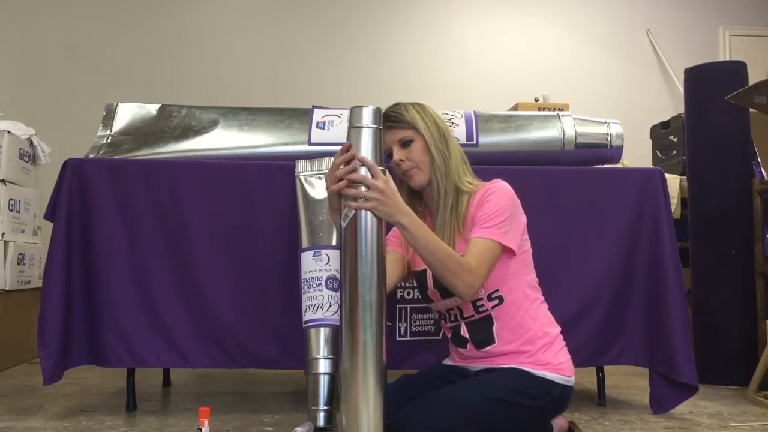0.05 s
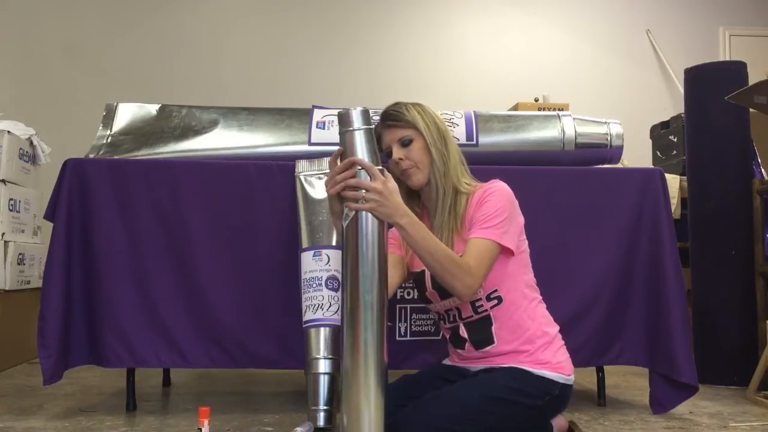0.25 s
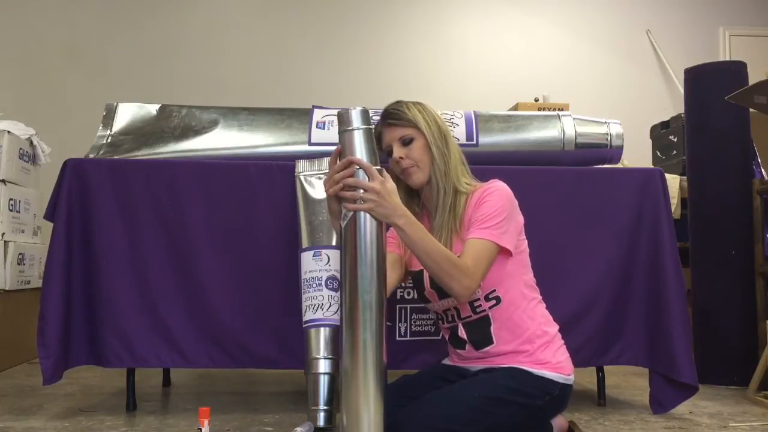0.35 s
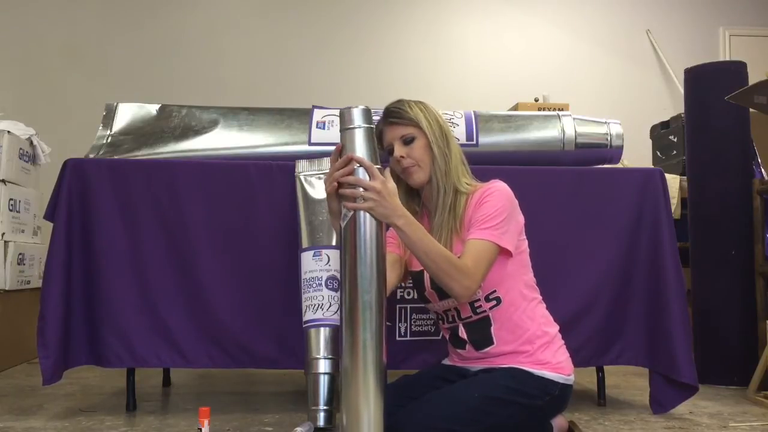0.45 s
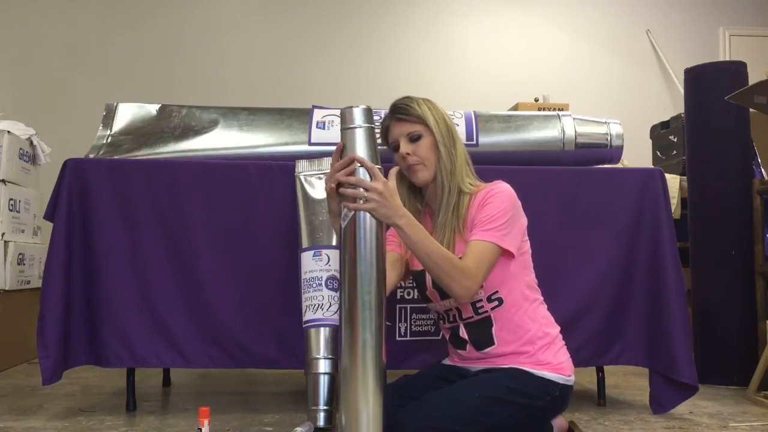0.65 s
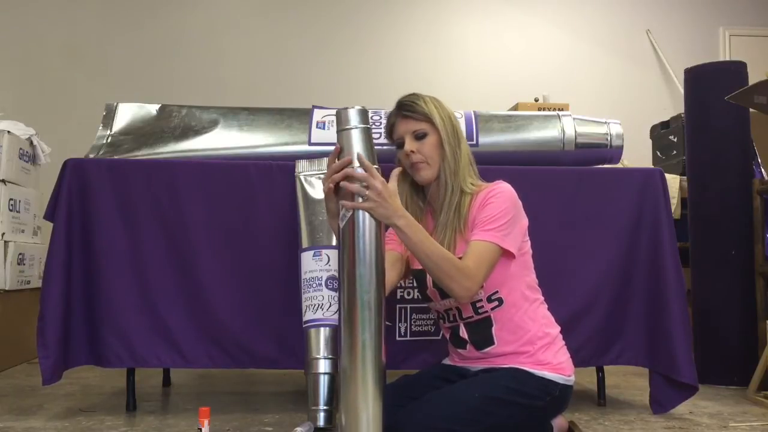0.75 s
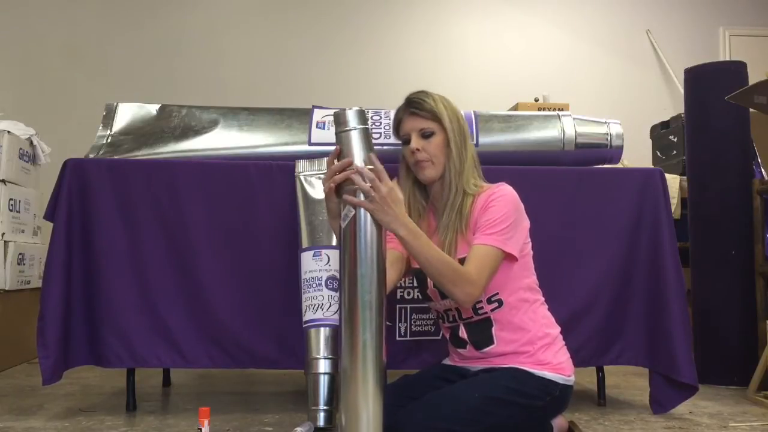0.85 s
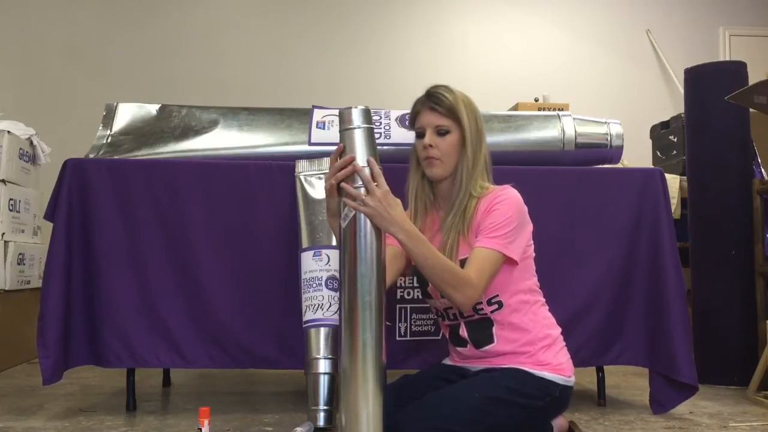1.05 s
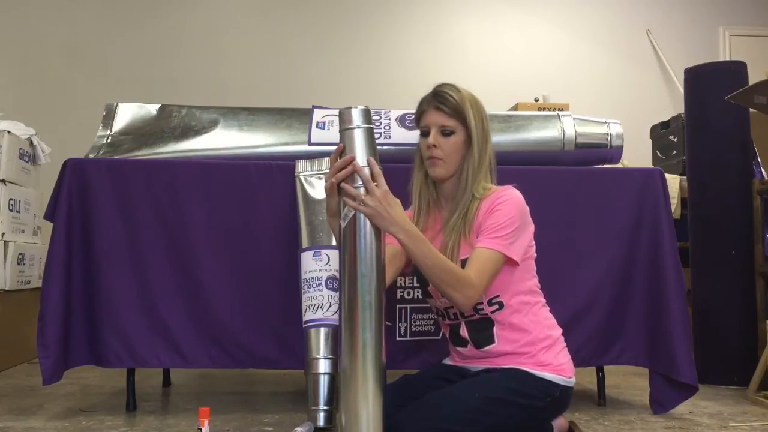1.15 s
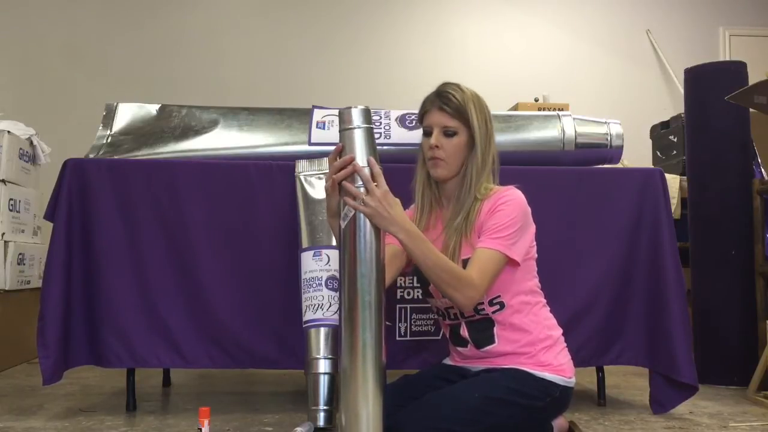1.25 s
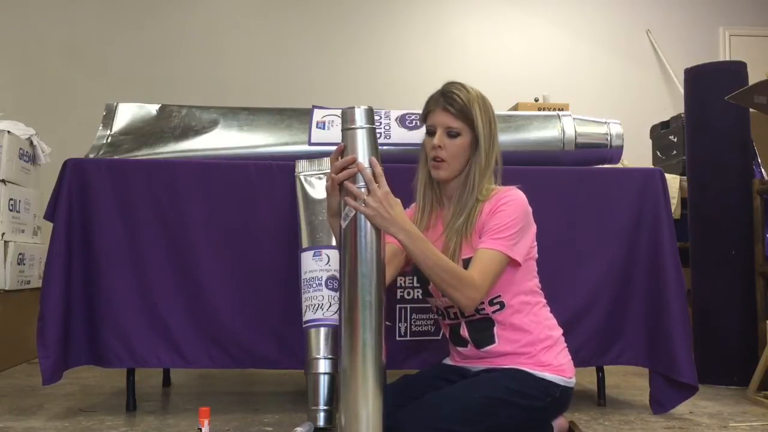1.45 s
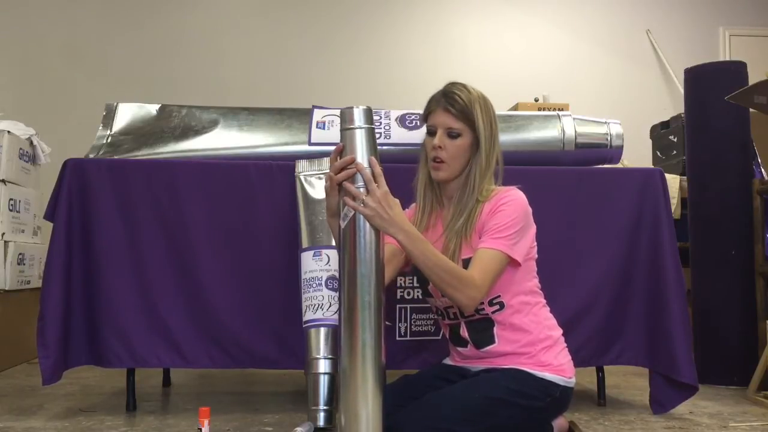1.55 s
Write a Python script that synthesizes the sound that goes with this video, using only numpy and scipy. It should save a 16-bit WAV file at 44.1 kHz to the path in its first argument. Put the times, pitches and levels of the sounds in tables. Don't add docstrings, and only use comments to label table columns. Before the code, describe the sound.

Thin sheet-metal duct snaps onto a pipe with a sharp crack, then light ticking and scraping

```python
import sys
import numpy as np
from scipy import signal
from scipy.fft import rfft, irfft
from scipy.io import wavfile
from scipy.ndimage import uniform_filter1d

SR = 44100
rng = np.random.default_rng(int(sys.argv[2]) if len(sys.argv) > 2 else 0)


def volts(x):
    e = np.asarray(x, float) / 20
    return 10 ** e


def wav_out(sig):
    wavfile.write(sys.argv[1], SR, np.round(np.clip(np.atleast_2d(sig).T, -1, 1) * 32767).astype(np.int16))


N = 70560

# t/s, level/dB, burst t60/s, low-body weight/dB
CRACKS = [(-.02, -52, 0.11, 3), (0.186, -59, 0.23, 2.5), (0.2217, -19, 0.055, -6), (.231, -29, 0.028, 15),
          (0.248, -33.5, 0.11, -11), (0.31, -38.5, 0.13, 10), (0.535, -63, 0.18, 16.5),
          (0.566, -52.5, 0.054, -2), (.571, -47.5, 0.021, -12), (0.681, -58.5, 0.022, 12),
          (0.749, -57.5, 0.056, -4), (0.761, -37, 0.048, -13), (.939, -47, 0.034, -11),
          (.946, -50.5, 0.048, 0.5), (1.066, -66.5, 0.016, 7), (1.102, -63, 0.018, -3),
          (1.261, -65, 0.031, 15), (1.4228, -62, 0.036, -4), (1.474, -60.5, 0.021, 1.5),
          (1.5868, -45, 0.044, -14)]
# f/Hz, level/dB per Hz
CRACK_COLOUR = [(200, -12.5), (900, -6.5), (1500, -3), (3400, -13.5), (4400, -9), (5000, -12.5),
                (9000, -13.5), (15000, -18)]
# f/Hz, level/dB, t60/s
DUCT_MODES = [(620, -52, 0.073), (988, 8.5, 0.61), (1158, -23, 0.085), (1270, 15, 0.16), (1350, -11, .1),
              (1620, -48, 0.027), (1883, 12, 0.04), (2330, -16, 0.055), (2670, -34, 0.035),
              (3860, -14, 0.024), (4530, -27, 0.039), (4460, -27, .03), (5600, -31, 0.049),
              (2470, 7.5, 0.057)]
# t/s, level/dB, f/Hz, t60/s
TICKS = [(0.194, -49, 1032, 0.17), (0.224, -18, 1224, 0.026), (.224, -22.5, 1851, 0.038),
         (.243, -25.5, 1359, 0.066), (.252, -32, 1650, 0.033), (0.295, -29.5, 1680, 0.051),
         (0.231, -19, 1269, 0.059), (0.257, -24.5, 1303, 0.036), (0.281, -25, 1740, 0.019),
         (.320, -32, 2150, 0.05), (.326, -22.5, 2153, 0.022), (.327, -24.5, 2452, 0.036),
         (0.334, -29, 1490, 0.022), (.342, -30.5, 1900, 0.046), (0.359, -39, 1426, 0.058),
         (.336, -26.5, 872, 0.036), (0.395, -39, 1370, 0.037), (0.568, -46, 1190, 0.04),
         (.582, -46.5, 1270, 0.072), (0.594, -47.5, 1185, 0.34), (0.64, -37, 1407, 0.047),
         (0.658, -46.5, 1348, 0.12), (0.681, -35, 1340, 0.059), (0.707, -46.5, 1404, 0.076),
         (0.766, -34.5, 1300, 0.029), (0.887, -51.5, 1200, 0.082), (.945, -32, 1296, 0.022),
         (0.978, -47, 915, 0.14), (1.064, -47.5, 1352, 0.065), (1.107, -44, 1292, 0.067),
         (1.123, -61, 1970, 0.042), (1.14, -70, 1570, 0.04), (1.07, -59, 1950, 0.084),
         (1.165, -58, 1495, .05), (1.194, -56, 1205, 0.074), (1.265, -43.5, 1270, 0.022),
         (1.265, -49.5, 1730, 0.026), (1.264, -52.5, 598, 0.067), (1.427, -45.5, 1130, 0.046),
         (1.428, -56, 577, 0.093), (1.479, -36, 1155, 0.016), (1.476, -51, 1853, 0.048)]
# t/s, level/dB, f/Hz, t60/s
POPS = [(0.225, -24, 391, 0.096), (0.233, -26, 187, 0.082), (0.278, -28.5, 458, 0.1),
        (0.301, -31.5, 187, 0.066), (0.331, -23.5, 376, 0.064), (0.333, -31, 154, 0.041),
        (.318, -30.5, 196, 0.083), (.345, -33, 201, 0.073), (1.04, -49, 189, .12), (1.145, -44.5, 343, .06),
        (1.275, -51.5, 302, 0.052), (.69, -48, 100, .08), (.342, -17.5, 576, 0.037),
        (0.384, -26, 364, 0.037), (0.393, -41, 183, 0.11), (0.442, -34.5, 165, 0.05),
        (0.546, -43, 363, 0.082), (0.553, -47.5, 194, 0.13), (0.583, -34, 117, 0.06),
        (0.643, -31, 168, 0.04), (.768, -34, 218, 0.036), (.778, -40, 614, 0.053),
        (0.849, -53, 214.2, 0.68), (0.897, -36, 210, 0.039), (0.949, -34, 213, 0.052),
        (0.977, -32.5, 244, 0.082), (0.982, -43.5, 417.4, 0.18), (0.981, -38, 118, 0.054),
        (1.030, -40, 386, 0.06), (1.104, -42, 184.5, 0.29), (1.11, -48, 556, 0.089),
        (1.127, -34, 182.7, 0.068), (1.101, -41, 336.4, 0.094), (1.149, -44, 251, 0.07),
        (1.191, -41, 185, 0.037), (1.267, -41, 184, 0.056), (1.479, -41.5, 207, 0.044)]
# t/s, level/dB, f/Hz, t60/s
MORE_TICKS = [(0.021, -49, 1270, 0.069), (.278, -30, 2600, 0.032), (0.452, -55, 990, 0.16),
              (.572, -47.5, 1185, 0.33), (.639, -46.5, 1990, 0.031), (0.68, -48, 1930, 0.074),
              (0.692, -42.5, 1083, 0.057), (.764, -45, 2100, 0.037), (.790, -52, 990, 0.19),
              (0.885, -50, 360, 0.14), (1.010, -60, 805, 0.33), (.946, -46, 2170, 0.047),
              (0.566, -49, 2600, 0.074), (.639, -51, 860, 0.052), (.548, -50.5, 1350, 0.079),
              (1.4765, -44, 850, 0.025), (1.8, -52, 890, 0.046), (.97, -50, 1200, .08), (.78, -47, 1400, .08)]
EDGE_HITS_S = (.2222, .7625, .9412, 1.5872)
# level/dB, f/Hz, t60/s
EDGE_MODES = [
    [(-31, 2700, .05), (-31, 4540, .05), (-30, 6080, .04), (-34, 6870, .04)],
    [(-40, 4350, .025), (-38, 4580, .03), (-45, 5940, .04), (-47, 7190, .04), (-48, 8730, .04)],
    [(-45, 4230, .04), (-47, 4420, .03), (-46, 5520, .05), (-49, 5350, .03), (-52, 7010, .04),
     (-52, 8000, .025)],
    [(-53, 1850, .05), (-51, 2350, .05), (-52, 2700, .05), (-46, 4300, .05), (-48, 4560, .05),
     (-51, 5430, .04), (-55, 7010, .04), (-54, 8910, .05)],
]
# start t/s, length/s, start f/Hz, end f/Hz, level/dB
BUCKLE = (.321, .018, 620, 1850, -27)
# t/s, level/dB
RUB_LEVEL = [(0, -59), (.09, -75), (.17, -66.5), (.205, -56.5), (.225, -34), (.31, -38.5), (.335, -33.5),
             (.40, -51.5), (.49, -62.5), (.53, -63.5), (.585, -53), (.74, -71.5), (.79, -53), (.86, -72),
             (.97, -50.5), (1.05, -72.5), (1.12, -57), (1.24, -73.5)]
# f/Hz, level/dB per Hz
RUB_COLOUR = [(80, -5.5), (190, 5.5), (400, 1.5), (800, -2.5), (1300, 4), (2300, -3), (3200, -17),
              (16000, -20)]
# f/Hz, level/dB per Hz
AIR_COLOUR = [(25, -11), (65, 1), (150, 2), (450, -10), (750, -6), (1250, -13.5), (2600, -15), (16000, -27)]
# f/Hz, level/dB
HUM = [(59.2, -72), (240.4, -75.5), (360.7, -70.5), (479.1, -81.5), (597.5, -81), (990.5, -80.5)]

TICK_RISE_S, POP_RISE_S = 0.0013, 0.0061


def unit(x):
    return x / np.sqrt(np.mean(x ** 2))


def fade(t, t60_s):
    return (t >= 0) * np.exp(-np.log(1000) * np.maximum(t, 0) / max(t60_s, .003))


def colour(x, table):
    hz, db = np.array(table).T
    bin_hz = np.maximum(np.fft.rfftfreq(N, 1 / SR), 1)
    gain = volts(np.interp(np.log(bin_hz), np.log(hz), db))
    return irfft(rfft(x) * unit(gain), N)


def butter(x, order, hz, kind):
    return signal.sosfilt(signal.butter(order, hz, kind, fs=SR, output="sos"), x)


def ring(x, hz, t60_s):
    pole = np.exp(2j * np.pi * hz / SR - np.log(1000) / (t60_s * SR))
    return signal.lfilter([1], [1, -pole], x).imag


def cracks(t):
    rattle_db, rise_share, body_hz = 3, 0.045, 2520
    grain = uniform_filter1d(rng.standard_normal(N), size=160) * np.sqrt(160)
    noise = rng.standard_normal(N) * unit(volts(rattle_db * grain))
    bursts = []
    for start_s, db, t60_s, _ in CRACKS:
        rise = np.clip((t - start_s) / (rise_share * t60_s), 0, 1)
        bursts.append(volts(db) * fade(t - start_s, t60_s) * rise * noise)
    bursts = np.array(bursts)
    body = bursts * volts(np.minimum(np.array(CRACKS)[:, 3:], 3))
    low = butter(body.sum(axis=0), 2, body_hz, "low")
    high = butter(bursts.sum(axis=0), 2, body_hz, "high")
    snap = colour(low - high, CRACK_COLOUR)
    shimmer = tail(snap, t, t60_s=0.3, high_t60_s=0.096, db=-3.5)
    return snap + shimmer + duct(body * volts(-41))


def duct(pushes):
    spread_db, max_t60_s = 2.5, .3
    scatter = volts(spread_db * rng.standard_normal((len(pushes), len(DUCT_MODES))))
    out = 0
    for strengths, (hz, db, t60_s) in zip(scatter.T, DUCT_MODES):
        drive = volts(db) * strengths @ pushes
        out = out + ring(drive, hz, np.clip(t60_s, .02, max_t60_s))
    return out


def edge_modes(t):
    hits = [(start_s, *mode) for start_s, modes in zip(EDGE_HITS_S, EDGE_MODES) for mode in modes]
    return blips(t, hits, TICK_RISE_S)


def blips(t, table, rise_s):
    roughness, detune = 0.58, 0.0593
    chance = rng.standard_normal((len(table), 3))
    out = 0
    for (start_s, db, hz, t60_s), c in zip(table, chance):
        u = np.maximum(t - start_s, 0)
        neighbour = np.sin(2 * np.pi * hz * (1 + detune * c[0]) * u + c[1])
        tone = np.sin(2 * np.pi * hz * u) + roughness * neighbour
        push = 1 - np.exp(-u / rise_s)
        out = out + volts(db) * fade(t - start_s, t60_s) * push * tone
    return out


def buckle(t):
    start_s, length_s, from_hz, to_hz, db = BUCKLE
    u = np.clip((t - start_s) / length_s, 0, 1)
    cycles = length_s * u * (from_hz + (to_hz - from_hz) * u / 2)
    return volts(db) * np.sin(np.pi * u) * np.sin(2 * np.pi * cycles)


def rub(t):
    count, slips_per_s, scatter_db = 48, 80, 2
    clatter_db, hiss_db = -58.5, -14.5
    push = volts(np.interp(t, *np.array(RUB_LEVEL).T))
    clatter = 0
    for hz in np.geomspace(110, 5000, count) * (1 + 0.026 * rng.standard_normal(count)):
        slips = (rng.random(N) < slips_per_s / SR) * volts(scatter_db * rng.standard_normal(N))
        t60_s = min(15.6 / hz + 0.031, .09)
        clatter = clatter + np.sqrt(hz / t60_s) * ring(slips * push, hz, t60_s)
    hiss = push * rng.standard_normal(N)
    return colour(volts(clatter_db) * clatter + volts(hiss_db) * hiss, RUB_COLOUR)


def tail(x, t, t60_s, high_t60_s, db):
    gap_s, split_hz = .004, 6000
    noise = rng.standard_normal(N)
    low = butter(noise, 1, split_hz, "low")
    echo = low * fade(t - gap_s, t60_s) + (noise - low) * fade(t - gap_s, high_t60_s)
    return volts(db) * signal.fftconvolve(x, echo / np.sqrt(np.sum(echo ** 2)))[:N]


def air(t):
    hum = 0
    for k, (hz, db) in enumerate(HUM):
        hum = hum + np.sqrt(2) * volts(db) * np.sin(2 * np.pi * hz * t + k)
    return volts(-67.5) * unit(colour(rng.standard_normal(N), AIR_COLOUR)) + hum


def scene():
    t = np.arange(N) / SR
    near = cracks(t) + edge_modes(t)
    near = near + blips(t, TICKS, TICK_RISE_S) + blips(t, POPS, POP_RISE_S) + blips(t, MORE_TICKS, TICK_RISE_S)
    near = near + buckle(t) + rub(t)
    near = butter(near, 2, 71, "high")
    room = tail(near, t, t60_s=.3, high_t60_s=.2, db=-11)
    return (near + room + air(t))[None]


def band_limit(x):
    return signal.sosfilt(signal.butter(12, 16660, fs=SR, output="sos"), x)


def record(dry):
    top_cut = signal.ellip(8, .1, 50, 15600, fs=SR, output="sos")
    mix = signal.sosfiltfilt(top_cut, dry)
    return band_limit(mix)


dry = scene()
out = record(dry)
wav_out(out)
```